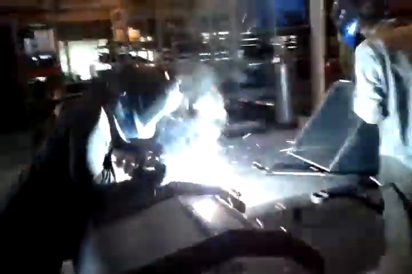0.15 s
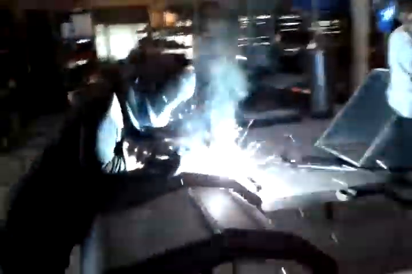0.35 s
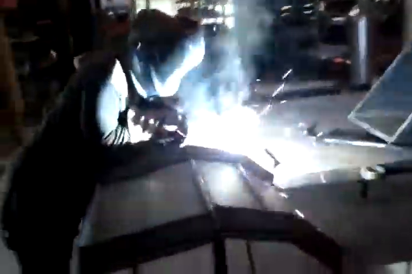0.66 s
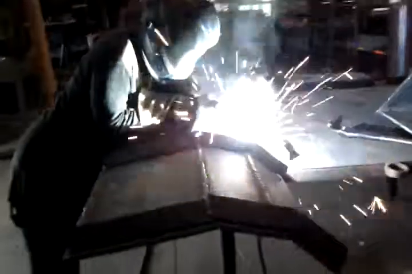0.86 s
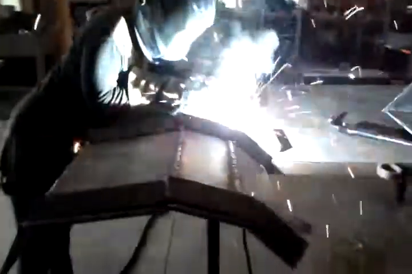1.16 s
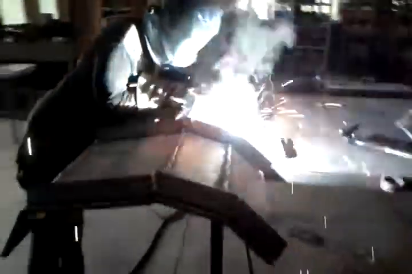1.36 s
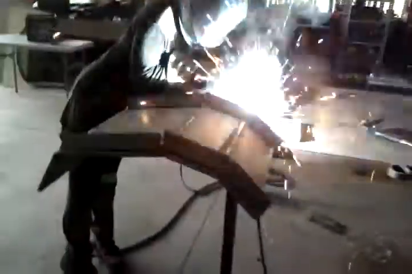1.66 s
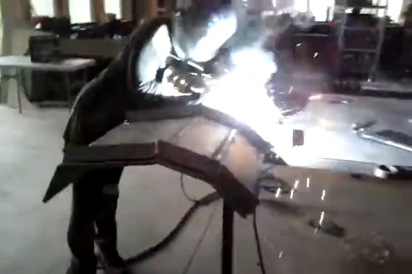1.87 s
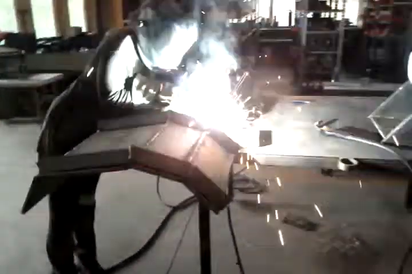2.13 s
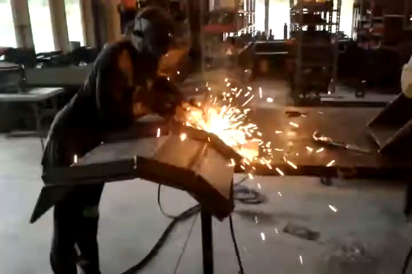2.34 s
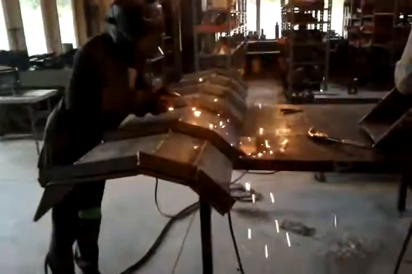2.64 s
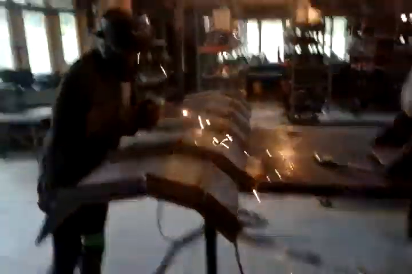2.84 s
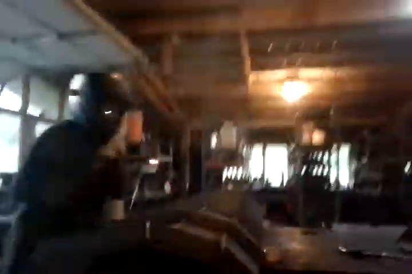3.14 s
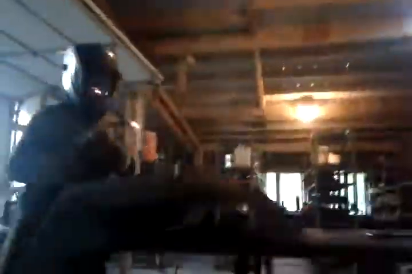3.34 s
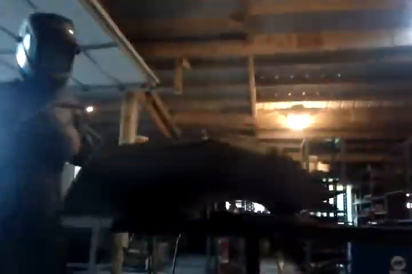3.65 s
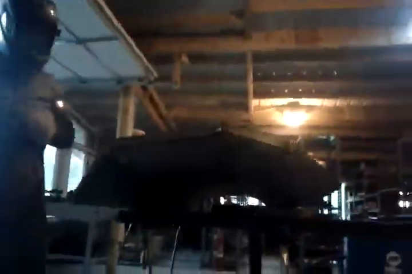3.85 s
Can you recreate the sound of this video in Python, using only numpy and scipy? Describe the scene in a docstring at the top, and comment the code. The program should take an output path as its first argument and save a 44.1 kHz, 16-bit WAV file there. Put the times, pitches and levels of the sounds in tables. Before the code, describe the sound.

Arc welding sputters with sharp pops, then burns in a harsh, crackling hiss that slightly overloads a small microphone. The arc stops and the large workshop rings out, leaving a faint hum, distant sizzles and soft knocks.

```python
"""An electric arc crackles on a steel frame in a large, echoing workshop: it sputters, burns, then stops.
Its sparks and bursting drops of metal are brief noise pulses over a hiss; the frame rings at its modes,
the hall reverberates, and the peaks overload a small microphone.
Afterwards the welder's mains hum is left, with a few far sizzles and soft knocks."""
import sys
import numpy as np
from scipy import signal
from scipy.fft import rfft
from scipy.io import wavfile

SR = 44100
rng = np.random.default_rng(int(sys.argv[2]) if len(sys.argv) > 2 else 0)


def int16_out(signal):
    """Quantize to a 16-bit WAV file."""
    q = np.round(np.clip(np.atleast_2d(signal).T, -1, 1) * 32767)
    wavfile.write(sys.argv[1], SR, q.astype(np.int16))


N = 176400
T = np.arange(N) / SR
MIC_HZ = 6890  # upper edge of the microphone's band

# spectrum of the arc and its bursting drops: frequency_hz, density_db
ARC_SPECTRUM = [(24, -58), (40, -43.5), (209, -19.5), (343, -13.5), (454, -16), (516, -7.5), (613, -10),
                (793, -5.5), (1190, -8.5), (1580, -3.5), (2590, -3), (3970, 1), (6110, 1), (6800, 0),
                (8840, -51), (15000, -120)]
# reverberation time of the hall: frequency_hz, t60_s
HALL_T60 = [(100, 1.7), (250, 1.6), (600, 0.94), (1400, 0.78), (3700, 0.78), (7000, 0.6)]


def arc():
    """Superposition: the arc's sparks, hiss and pops arrive directly, then as echoes and reverberation."""
    # strength of the arc: time_s, level_db
    strength = [(0, -11.5), (.09, -10), (.2, -14), (.218, -4.5), (.255, -13), (.28, -23), (.41, -17.5),
                (.42, -7), (.47, -15), (.535, -10.5), (.55, -19.5), (.6, -30), (.63, -19), (.66, -28.5),
                (.725, -23.5), (.75, -16.5), (.78, -26.5), (.83, -18.5), (.865, -13), (.97, -11.5),
                (1.17, -8), (1.36, -12), (1.42, -18.5), (1.47, -9.5), (1.58, -12), (1.72, -9.5),
                (1.83, -14), (1.96, -7), (2.06, -16), (2.12, -9.5), (2.21, -12), (2.25, -30), (2.3, -12.5),
                (2.345, -22), (2.38, -42)]
    # gain of the arc's band below body_hz: time_s, gain_db
    body = [(0, 0.5), (.24, -5), (.45, -3.5), (.7, 2.5), (.95, 2), (1.15, -2.5), (1.5, 1.5), (1.7, 0.5),
            (2.3, 1)]
    # how strongly the arc drives the frame: time_s, gain_db
    frame_drive = [(0, -9), (.6, -16), (1.1, -7), (1.8, -6.5), (2.3, 3.5)]
    # early reflections off the frame and floor: delay_s, gain
    reflections = [(.0011, 0.18), (.0034, -0.41), (.0072, 0.55), (0.0152, 0.45)]
    flutter_db, flutter_hz, body_hz = 2.5, 60, 2350
    flutter = amp(flutter_db * unit(lowpass(rng.standard_normal(N), flutter_hz)))
    sparks = amp(-2) * crackle(per_s=420, spread_db=5)
    hiss = amp(-5) * rng.standard_normal(N)
    pops = bursting_drops()
    envelope = amp(curve(strength)) * (T < strength[-1][0])
    burn = colour(unit(flutter) * (sparks + hiss) * envelope, ARC_SPECTRUM)
    lows = signal.sosfiltfilt(signal.butter(3, body_hz, fs=SR, output="sos"), burn)
    burn += (amp(curve(body)) - 1) * lows
    echoes = sum(gain * np.interp(T - s, T, burn, left=0) for s, gain in reflections)
    # the hall is already ringing when the sound begins
    opening_db = strength[0][1] - 60 * T / at_frequency(HALL_T60, 4000)
    opening_tail = colour(rng.standard_normal(N), ARC_SPECTRUM) * amp(opening_db)
    ringing = steel_frame(burn * amp(curve(frame_drive)))
    reverberant = hall(burn + ringing + amp(-5.5) * pops) + opening_tail
    return amp(-5.5) * (burn + echoes + pops) + amp(-1.5) * reverberant


def crackle(per_s, spread_db):
    """Shot noise: sparks of random size occur independently, and their decaying powers add."""
    decay_s = 0.00048
    sizes = amp(spread_db * np.minimum(rng.exponential(1, N), 3.5))
    sparks = sizes * (rng.random(N) < per_s / SR)
    power = signal.lfilter([1], [1, -np.exp(-2 / (decay_s * SR))], sparks ** 2)
    return unit(np.sqrt(power) * rng.standard_normal(N))


def bursting_drops():
    """Impulsive sources: each drop of metal bursts in a brief, hence broadband, pulse of noise."""
    # bursts: start_s, level_db
    drops = [(0.2165, 4.5), (0.3486, -12), (0.4172, -4), (0.4789, -0.5), (0.639, -3), (0.7334, -3),
             (0.804, -7), (0.8407, -2), (0.858, -3.5), (.9073, -5), (1.2979, 4), (1.4389, -3), (1.457, 1),
             (2.2762, -22), (2.3087, -3)]
    envelope = sum(amp(db) * decay(s, decay_s=0.0034) for s, db in drops)
    pops = colour(envelope * rng.standard_normal(N), ARC_SPECTRUM)
    return butterworth(pops, "high", hz=600, order=1)


def steel_frame(drive):
    """Modal resonance: every spark excites the frame's modes, each a damped oscillator."""
    # modes of the frame: frequency_hz, t60_s, gain_db
    modes = [(1646, .03, -6.5), (1790, 0.026, -4), (1970, 0.045, -4.5), (2080, 0.11, -11),
             (2840, 0.088, -9), (3260, .2, -11)]
    ringing = np.zeros(N)
    for hz, t60, db in modes:
        pole = np.exp((2j * np.pi * hz - np.log(1000) / t60) / SR)
        ringing += 2 * amp(db) * signal.lfilter([1 - abs(pole)], [1, -pole], drive).real
    return ringing


def sizzles():
    """Dense shot noise merges into short hisses, heard from farther off with the hall's reverberation."""
    # far sizzles: start_s, attack_s, hold_s, release_s, level_db, cutoff_hz
    bursts = [(2.759, 0.054, .01, 0.044, -36.5, 8900), (2.89, .005, .005, .015, -40, 9000),
              (2.91, .03, 0.079, 0.046, -48, 9000), (3.133, 0.0027, 0.016, 0.068, -31, 8900),
              (3.554, 0.041, 0.1, 0.046, -48, 7000), (3.756, 0.056, 0.031, 0.04, -34.5, 4800)]
    # their common spectrum: frequency_hz, density_db
    spectrum = [(530, -41), (900, -3), (947, -11), (1100, -6), (1360, -4), (1990, -3), (2150, -1),
                (2460, -3.5), (2970, 0), (4890, 1), (6300, 0), (6800, -1.5), (8840, -35), (15000, -120)]
    grain, sizzle = crackle(per_s=4000, spread_db=1.5), np.zeros(N)
    for start, attack, hold, release, db, cutoff_hz in bursts:
        rise = np.clip((T - start) / attack, 0, 1)
        fall = np.exp(-np.maximum(T - start - attack - hold, 0) / release)
        sizzle += butterworth(amp(db) * rise * fall * grain, "low", cutoff_hz)
    sizzle = butterworth(colour(sizzle, spectrum), "high", hz=900)
    return amp(-2) * sizzle + amp(-4.5) * hall(sizzle)


def knocks():
    """Heavily damped impacts: soft dull bumps, each a fast-dying band of noise."""
    # bumps: start_s, centre_hz, decay_s, level_db
    impacts = [(3.134, 293, 0.034, -51.5), (3.245, 70, .015, -45.5), (3.325, 600, 0.03, -53),
               (3.431, 75, 0.015, -47), (3.458, 218, 0.01, -50), (3.513, 670, .018, -47),
               (3.558, 380, 0.017, -50), (3.648, 700, 0.029, -53)]
    edge_ratio = 1.42
    bumps = np.zeros(N)
    for start, hz, decay_s, db in impacts:
        band_hz = [hz / edge_ratio, hz * edge_ratio]
        noise = rng.standard_normal(N)
        band_rms = np.std(butterworth(noise, "band", band_hz))
        bumps += amp(db) * butterworth(noise * decay(start, decay_s), "band", band_hz) / band_rms
    return bumps + amp(-9) * hall(bumps)


def hum_and_air():
    """The welder hums near harmonics of the mains frequency, over the steady noise of the hall's air."""
    # partials of the hum: frequency_hz, level_db
    partials = [(120, -62), (241, -59), (301, -70)]
    # spectrum of the air: frequency_hz, density_db
    air_spectrum = [(18, 0), (30, -30.5), (112, -18), (165, -0.5), (193, -5.5), (489, -4.5), (902, -7),
                    (966, -7), (1330, -7.5), (1910, -8), (6800, -7), (8840, -41), (15000, -120)]
    hum = sum(amp(db) * np.sin(2 * np.pi * (hz * T + rng.random())) for hz, db in partials)
    return hum + amp(-49) * colour(rng.standard_normal(N), air_spectrum)


def hall(source):
    """Reverberation: random reflections die away exponentially, the treble sooner than the bass."""
    reverberant = np.zeros(N)
    for k in range(3):
        taps = rng.choice([-1., 1.], SR) * (rng.random(SR) < .1) * (T[:SR] > .004)
        hz, t, bands = signal.stft(taps, SR, nperseg=256)
        absorption = amp(-60 * t / at_frequency(HALL_T60, hz)[:, None])
        tail = signal.istft(bands * absorption, SR, nperseg=256)[1]
        tail /= np.sqrt(np.mean(abs(rfft(tail, SR)[1000:6000]) ** 2))  # unit gain over 1-6 kHz
        # three tails crossfade slowly as the microphone moves
        share = np.sqrt(2 / 3) * np.cos(np.pi * (T / 2 + k / 3))
        reverberant += signal.oaconvolve(source * share, tail)[:N]
    return reverberant


def amp(db):
    return 10 ** (np.asarray(db) / 20)


def unit(x):
    return x / np.sqrt(np.mean(x ** 2) + 1e-20)


def curve(points):
    return np.interp(T, *np.transpose(points))


def decay(start, decay_s):
    return (T >= start) * np.exp(-np.maximum(T - start, 0) / decay_s)


def at_frequency(points, hz):
    points_hz, values = np.transpose(points)
    return np.interp(np.log(hz + 1), np.log(points_hz + 1), values)


def lowpass(x, hz):
    return signal.oaconvolve(x, signal.firwin(1023, hz, window=("kaiser", 9), fs=SR), "same")


def butterworth(x, kind, hz, order=2):
    return signal.sosfilt(signal.butter(order, hz, kind, fs=SR, output="sos"), x)


def colour(x, spectrum):
    """Minimum-phase filtering: unit white noise takes this spectrum, with unit power below MIC_HZ."""
    hz = abs(np.fft.fftfreq(4096, 1 / SR))
    gain = amp(at_frequency(spectrum, hz))
    gain /= np.sqrt(np.mean(gain ** 2 * (hz < MIC_HZ)))
    response = np.exp(np.conj(signal.hilbert(np.log(gain))))
    return signal.oaconvolve(x, np.fft.ifft(response).real[:2048])[:N]


def saturate(x, ceiling, hardness):
    """Soft clipping: linear for small signals, levelling off towards the ceiling."""
    return x / (1 + abs(x / ceiling) ** hardness) ** (1 / hardness)


def scene():
    """Linear superposition: the pressures of all sources add in one channel."""
    return (arc() + sizzles() + knocks() + hum_and_air())[None]


def record(dry):
    """Nonlinear distortion: a narrow-band microphone rounds the peaks; the tallest clip, adding treble."""
    pickup = lowpass(dry[0], MIC_HZ) * amp(1)
    rounded = lowpass(saturate(pickup, ceiling=0.95, hardness=3.1), MIC_HZ)
    clipped = saturate(rounded, ceiling=0.75, hardness=9.4)
    return lowpass(clipped, hz=15850)[None]


dry = scene()
out = record(dry)
int16_out(out)
```